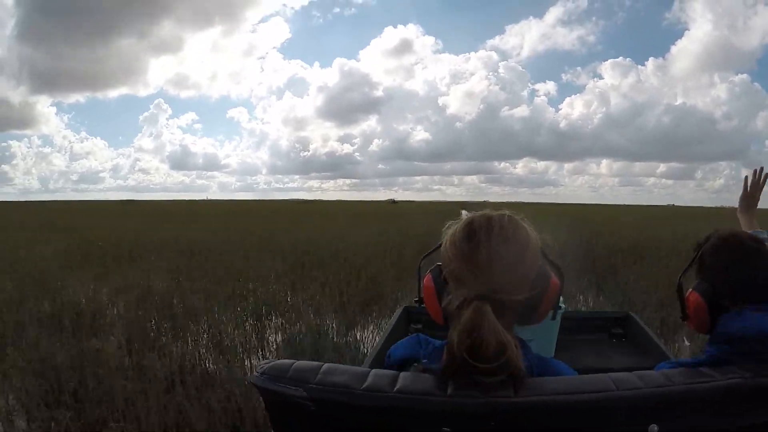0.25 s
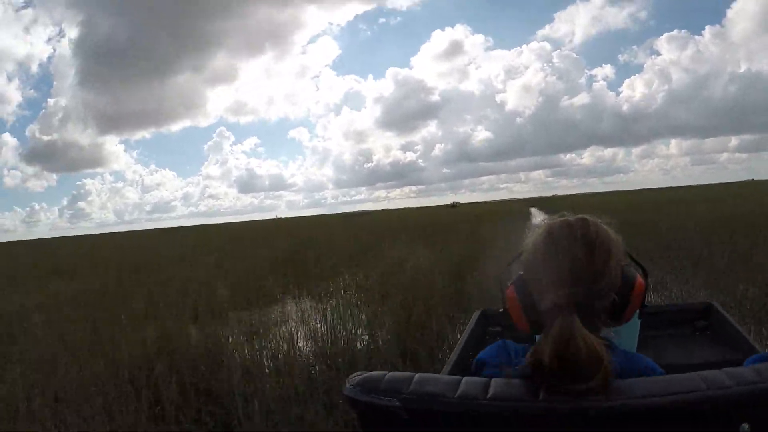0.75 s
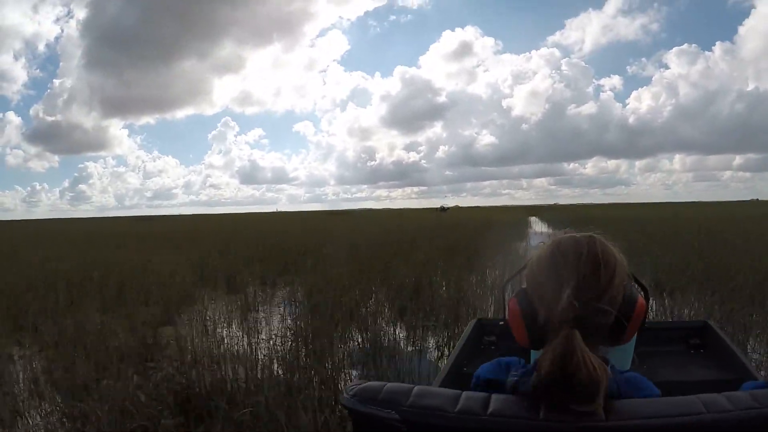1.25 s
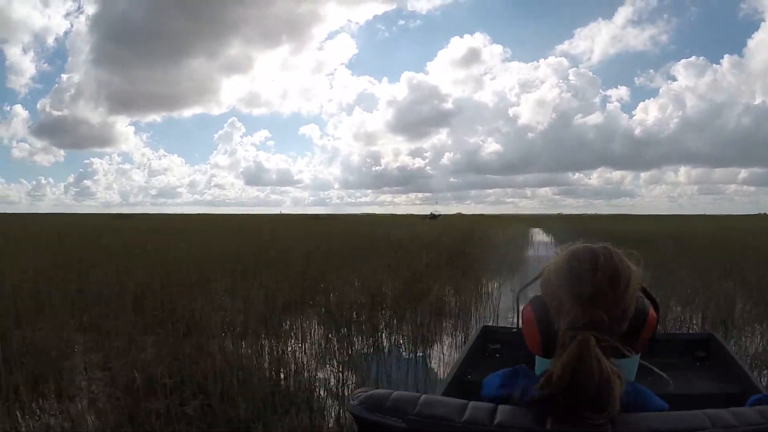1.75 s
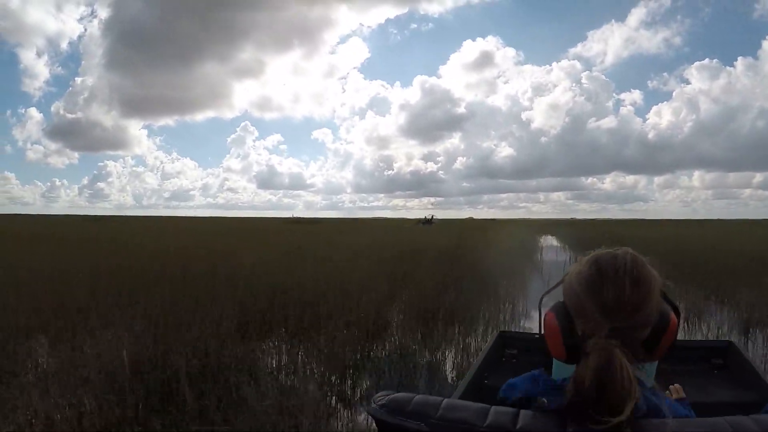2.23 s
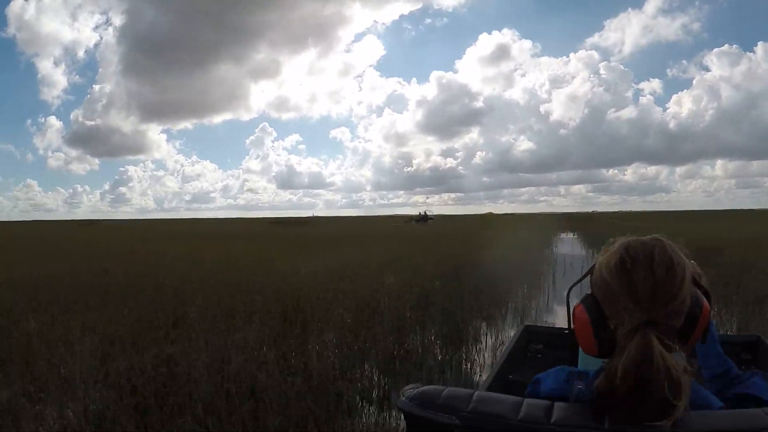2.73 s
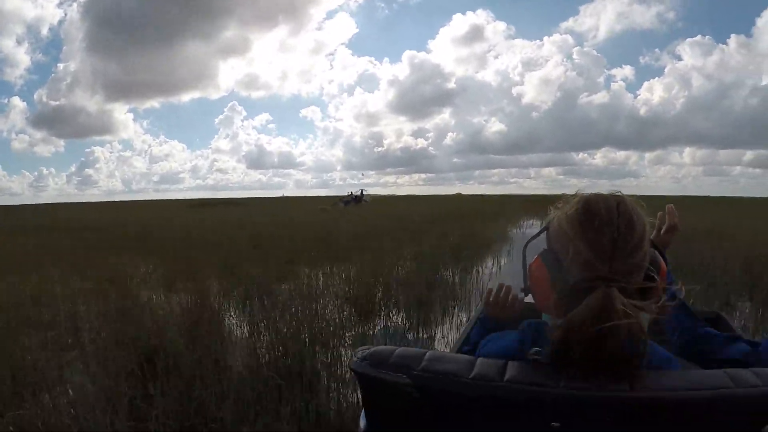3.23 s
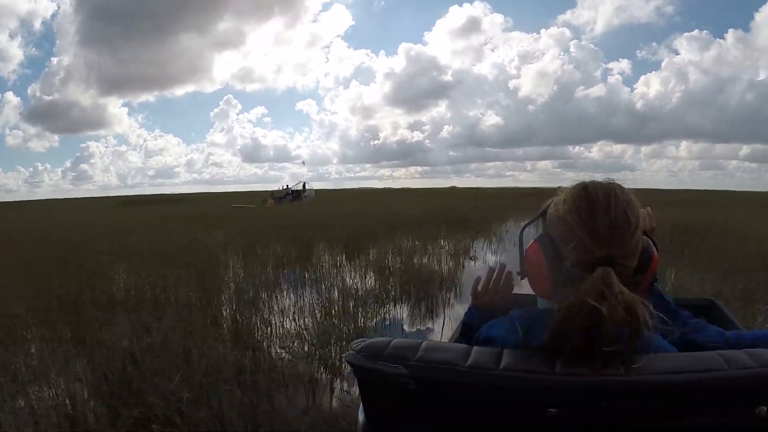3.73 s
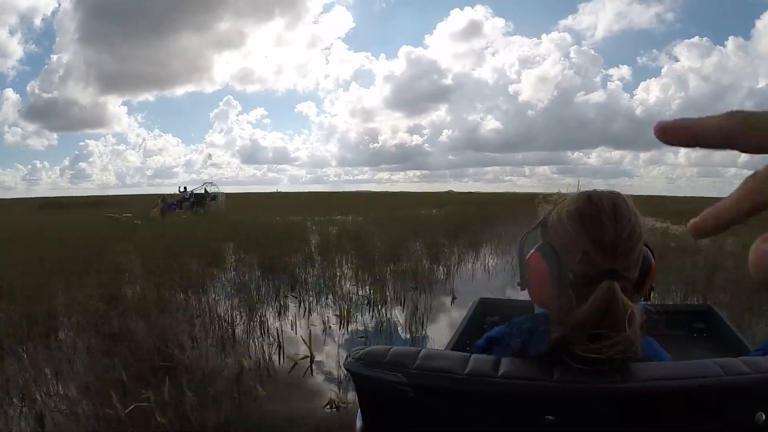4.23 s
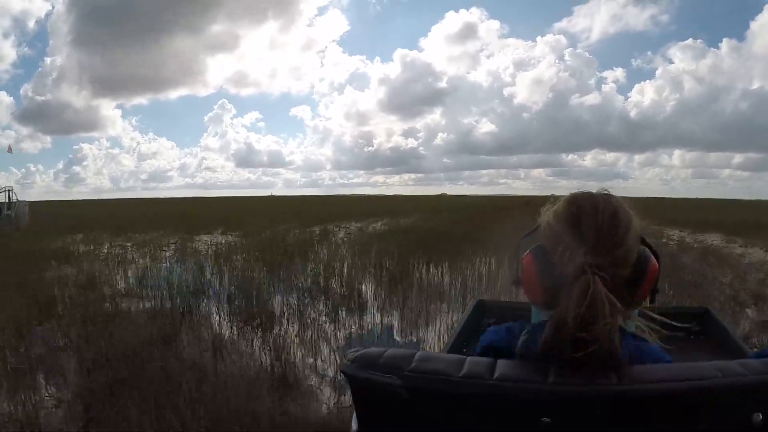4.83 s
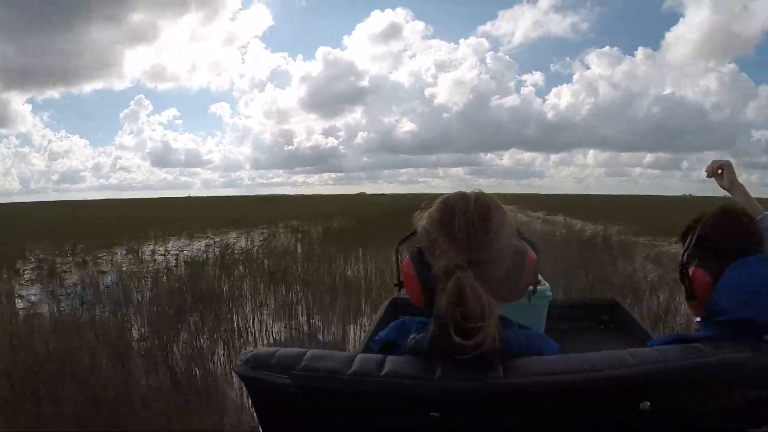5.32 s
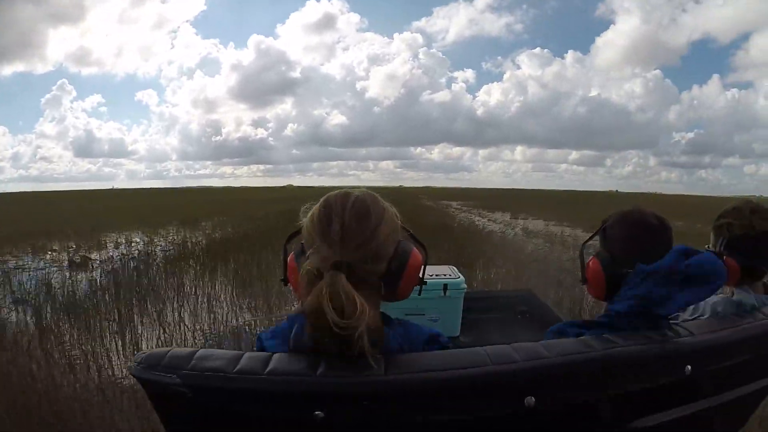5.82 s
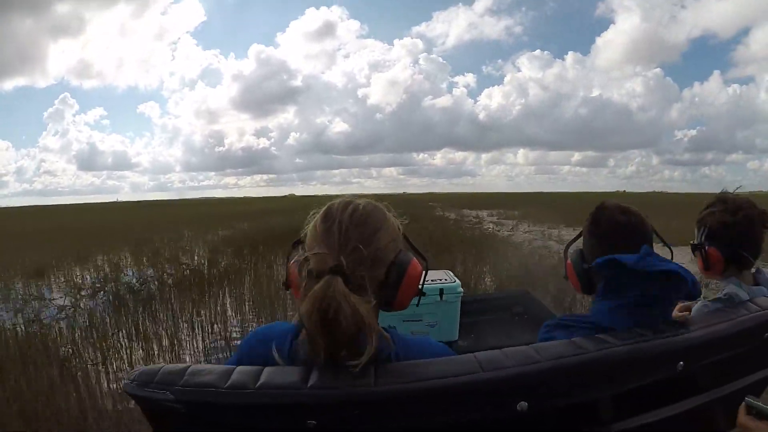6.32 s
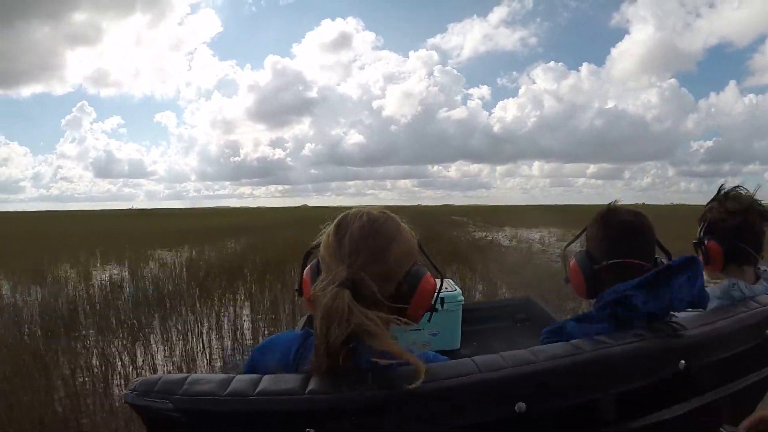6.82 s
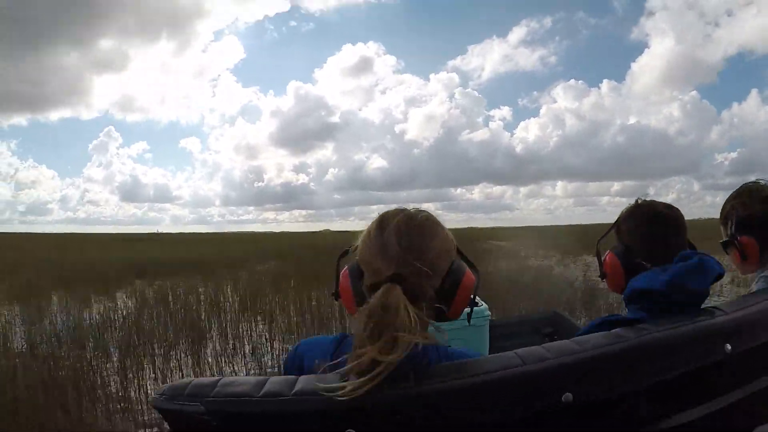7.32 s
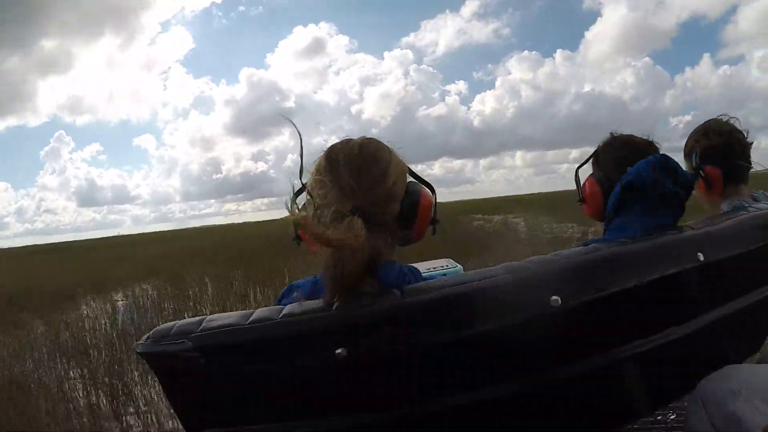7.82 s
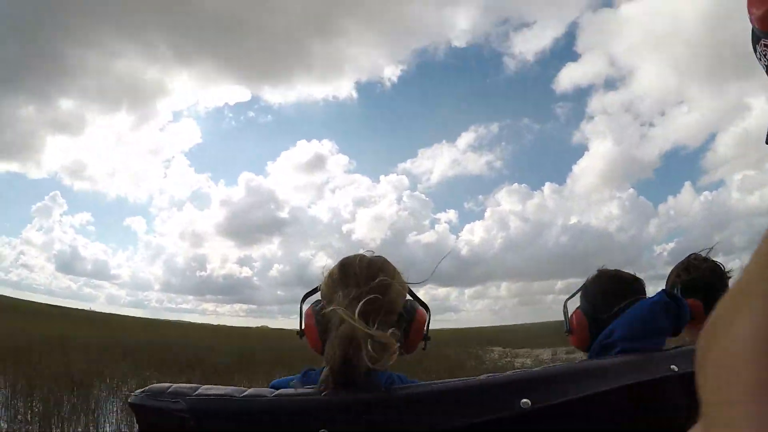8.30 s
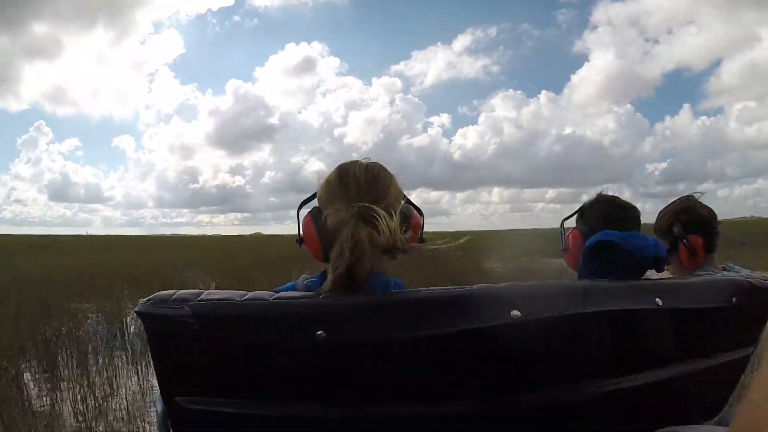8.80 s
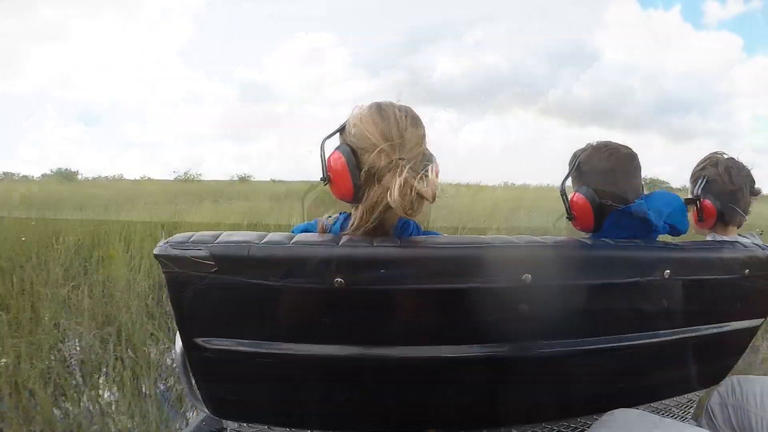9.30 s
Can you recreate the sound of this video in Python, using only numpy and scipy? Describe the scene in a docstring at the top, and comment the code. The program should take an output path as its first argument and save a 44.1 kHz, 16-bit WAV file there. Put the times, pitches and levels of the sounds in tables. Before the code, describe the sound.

An airboat's deep, steady engine and propeller drone fills a windy open deck, with wind puffs and spray ticks, then breaks into whistling gusts.

```python
"""An airboat's three-blade propeller, geared down from an eight-cylinder engine, drones over its own roar.
A small camera hears it in the wind on board, turning twice; locked sine tones make the drone.
Shaped noise makes the roar, hiss and wind; spray ticks ring and puffs of wind strike the microphone.
Near the end the drone fades, the sound drops out for a moment, and whistling gusts take over."""
import sys
import numpy as np
from scipy import signal
from scipy.io import wavfile
from scipy.ndimage import uniform_filter1d, minimum_filter1d

SR = 44100
rng = np.random.default_rng(int(sys.argv[2]) if len(sys.argv) > 2 else 0)


def put_to_file(sound):
    """Save the sound as 16-bit audio at rate SR, in the file named by the first command-line argument."""
    columns = np.atleast_2d(sound).T  # one column per channel
    safe = np.clip(columns, -1, 1)
    whole_steps = np.round(safe * 32767)
    wavfile.write(sys.argv[1], SR, whole_steps.astype(np.int16))


N = 421149
TIME_S = np.arange(N) / SR

# Slow levels of propeller wash and hiss: start_s, wash_db, hiss_db, hiss_top_dulling_db
WASH_AND_HISS = [(0.0, -49, -66, -2.5), (2.52, -48.5, -65, -1.5), (3.0, -52.5, -67, -4),
                 (5.45, -50, -65.5, -2.5), (5.9, -47.5, -70, 1), (6.05, -48.5, -66, 1),
                 (6.18, -48.5, -65.5, 1), (6.28, -60, -68, -1), (6.43, -50, -64.5, 2),
                 (6.67, -46, -66.5, -1.5), (7.04, -49, -65.5, 2), (7.12, -47.5, -69.5, -1),
                 (7.38, -52, -68.5, -2), (7.5, -47, -66.5, 0), (7.65, -51.5, -67, -1),
                 (8.85, -41, -63.5, 0.5), (9.18, -46, -69, -2), (9.55, -40, -84, -6)]
# Brief silence: from_s, to_s
DROP_OUT_S = (9.2020, 9.2179)


def amp(db):
    """Amplitude factor of a level in dB."""
    return 10 ** (np.asarray(db) / 20)


def evened(x):
    """Scales to rms 1."""
    return x / np.sqrt(np.mean(x ** 2) + 1e-20)


def columns(rows):
    """Draws each column after the first (s) as a line through time."""
    s, *values = np.transpose(rows)
    return [np.interp(TIME_S, s, v) for v in values]


def wander(seconds):
    """Random drift of rms 1: white noise averaged twice over the given time."""
    n = max(int(seconds * SR), 1)
    white = rng.standard_normal(N)
    return evened(uniform_filter1d(uniform_filter1d(white, n), n))


def noise(shape, lo_hz, hi_hz, patchy_db, size):
    """Random short-time spectra with drifting patches; rms 1 between lo_hz and hi_hz."""
    hop = size // 4
    bin_hz = np.fft.rfftfreq(size, 1 / SR)
    real, imag, patches = rng.standard_normal((N // hop + 9, len(bin_hz), 3)).T
    patches = uniform_filter1d(patches, size=5, axis=0)  # across frequency
    patches = evened(uniform_filter1d(patches, size=8, axis=1))  # across time
    shape_hz, shape_db = np.transpose(shape)
    bin_db = np.interp(np.log(bin_hz + 1), np.log(shape_hz), shape_db, right=-120)
    spectra = (real + 1j * imag) * amp(bin_db[:, None] + patchy_db * patches)
    in_band = (bin_hz >= lo_hz) & (bin_hz < hi_hz)
    share = np.sum(abs(spectra[in_band]) ** 2) / np.sum(abs(spectra) ** 2)
    sound = signal.istft(spectra, nperseg=size, noverlap=size - hop)[1]
    return evened(sound[size:N + size]) / np.sqrt(share)


def facing(levels_db):
    """Blends three levels as the camera turns twice."""
    # Camera turns: from_s, to_s
    camera_turns = [(4.9, 5.6), (7.8, 8)]
    return np.interp(TIME_S, np.ravel(camera_turns), np.repeat(levels_db, [1, 2, 1]))


def drone():
    """Blade and exhaust tones, locked by the gear; moving air shakes their arrival time and level."""
    # Blade-pass rate: time_s, rate_hz
    speed = [(0.0, 85.35), (0.2, 86.6), (0.45, 87.72), (1.2, 88.8), (1.8, 88.95), (2.1, 89.25),
             (2.8, 88.95), (4.8, 89.17), (5.0, 88.78), (5.3, 87.85), (5.6, 87.51), (6.2, 87.14),
             (6.6, 86.48), (7.0, 87.15), (8.1, 87.05), (8.6, 86.41), (9.55, 86.42)]
    # Blade tones: blade_multiple, ahead_db, after_first_turn_db, after_second_turn_db
    blade_tones = [(1, -29.5, -31.5, -31), (2, -37, -37, -33), (4, -47, -46.5, -50.5), (6, -53, -56, -52.5),
                   (7, -61.5, -65.5, -53), (8, -61, -63, -49), (9, -67, -70.5, -54),
                   (10, -64.5, -63, -59.5), (11, -57.5, -60.5, -64), (12, -65, -68, -61.5),
                   (13, -65, -67, -65), (14, -71, -73, -63), (15, -65.5, -72.5, -72),
                   (16, -73.5, -69.5, -70)]
    # The two blade tones that change most: time_s, third_db, fifth_db
    moving_tones = [(0, -40, -44), (.35, -29, -41.5), (.9, -26.5, -52), (1.8, -32, -60.5),
                    (2.5, -28.5, -61.5), (3.6, -32.5, -53), (4.8, -31, -49), (5.6, -34, -41.5),
                    (6.8, -32, -40.5), (7.7, -34, -41), (8.2, -30, -37), (8.5, -26, -41.5),
                    (9.0, -36.5, -38), (9.55, -35, -43)]
    # Exhaust tones: firing_cycle_multiple, ahead_db, after_first_turn_db, after_second_turn_db
    exhaust = [(3.005, -39.5, -41.5, -41), (5.004, -41, -37, -39.5), (6.974, -46, -55, -45),
               (7.99, -41, -47, -45), (9.01, -47, -58.5, -57.5), (10.98, -55.5, -49, -61.5),
               (13, -55, -59, -57.5), (14.92, -51, -51, -44), (15.92, -63.5, -61.5, -55.5),
               (18.33, -63.5, -62, -57), (23.97, -70.5, -64, -59.5), (25.15, -65, -68, -56)]
    cycles_per_blade = .382  # firing cycles per blade pass, set by the gear
    fade_s, fade_db_per_s = 8.98, -22
    drift_db, drift_s = .35, .25

    blade_passes = np.cumsum(columns(speed)[0]) / SR + .004 * wander(.025)
    tones = [(k, facing(db)) for k, *db in blade_tones]
    tones += zip((3, 5), columns(moving_tones))
    tones += [(k * cycles_per_blade, facing(db)) for k, *db in exhaust]

    total = np.zeros(N)
    for k, level_db in tones:
        # higher tones waver, drift and slip more
        waver_db = .33 * k * wander(.05) + drift_db * np.sqrt(k) * wander(drift_s)
        slip_cycles = .001 * k ** 2 / np.sqrt(1 + k ** 2 / 100) * wander(.06)
        cycles = k * blade_passes + rng.random() + slip_cycles
        total += amp(level_db + waver_db) * np.sqrt(2) * np.sin(2 * np.pi * cycles)
    fade_db = fade_db_per_s * np.maximum(TIME_S - fade_s, 0)
    return amp(fade_db) * total


def air():
    """Rumble and wash waver on their own; eddies roughen the roar and make flutter come in quick bursts."""
    # Noise spectra: freq_hz, relative_db_per_hz
    rumble_shape = [(12, -28), (25, 0.5), (60, 7), (120, 3.5), (250, -7), (400, -13), (800, -37)]
    wash_shape = [(80, -4.5), (200, 9), (310, 10.5), (400, 4.5), (530, 3.5), (570, 0), (750, -3.5),
                  (900, -8), (1300, -26.5), (2000, -48)]
    roar_shape = [(200, -13), (500, -2.5), (800, 5.5), (1200, 6), (1600, -5.5), (2500, -22.5), (4000, -43)]
    flutter_shape = [(300, -5.5), (1000, 1.5), (1700, 6.5), (2800, -4.5), (3700, -5.5), (5000, -10.5),
                     (6300, -21), (7200, -43), (10000, -52)]
    # Rumble level: time_s, level_db
    rumble_level = [(0, -35), (1.3, -36.5), (2, -33.5), (3.7, -36.5), (4.4, -37), (6.7, -31.5), (7.4, -34),
                    (8.8, -33.5), (9.2, -39), (9.35, -33.5), (9.55, -27)]
    # Wind on the microphone: time_s, flutter_db, roar_above_flutter_db
    gusts = [(0.0, -58, 6), (2.15, -57, 4.5), (3.06, -60, 6.5), (5.26, -58.5, 9), (5.29, -58, 9.5),
             (6.14, -56, 3.5), (6.28, -60, 6), (6.54, -55, 5.5), (6.94, -54.5, 4), (7.42, -62, 6),
             (7.47, -56.5, 6), (8.35, -59.5, 3.5), (8.96, -60, 11.5), (9.18, -64.5, 9), (9.26, -59.5, 9),
             (9.28, -75, 14), (9.36, -55, 15), (9.39, -56, 15), (9.47, -47.5, 6), (9.52, -56.5, 22),
             (9.55, -60, 17)]
    # Brief level changes of all this noise, mostly dips: middle_s, gain_db, half_length_s
    level_bumps = [(5.726, -4, 0.016), (7.13, -4, 0.021), (9.244, 0, 0.015), (9.29, 1, 0.011),
                   (9.419, -11, 0.021), (9.509, -12, 0.013)]
    gusty_db, gusty_s = 1, .041

    flutter_db, above_db = columns(gusts)
    flutter_db = flutter_db + gusty_db * wander(gusty_s)
    roar_db = flutter_db + above_db
    eddies = wander(.0019)

    rumble_db = columns(rumble_level)[0] + 2.4 * wander(.0098) + .33 * wander(.12)
    rumble = amp(rumble_db) * noise(rumble_shape, 20, 70, .93, size=2048)
    wash_db = columns(WASH_AND_HISS)[0] + 1.9 * wander(.0046)
    wash = amp(wash_db) * noise(wash_shape, 520, 850, 2.1, size=1024)
    roar = amp(roar_db + 1.1 * eddies) * noise(roar_shape, 900, 1500, 1.0, size=512)
    burst_db = .73 * eddies + 1.0 * wander(.0015)
    flutter = amp(flutter_db + burst_db) * noise(flutter_shape, 1600, 3900, 1.0, size=256)

    bump_db = sum(db * np.exp(-((TIME_S - s) / half_s) ** 2) for s, db, half_s in level_bumps)
    return amp(bump_db) * (rumble + wash + roar + flutter)


def hiss():
    """Spray and blade-tip hiss: nearly even noise whose top band is dulled separately."""
    # Noise spectra: freq_hz, relative_db_per_hz
    body_shape = [(1500, -11), (3000, -13), (4000, -1), (5700, 5), (6400, -3), (7200, -17.5), (8000, -39)]
    top_shape = [(6000, -17.5), (7200, 1), (9000, -4), (10500, -16), (12000, -46)]
    _, hiss_db, dulling_db = columns(WASH_AND_HISS)
    body = noise(body_shape, 4500, 6500, 1.0, size=512)
    top = amp(-21.0 - dulling_db) * noise(top_shape, 7200, 9000, .8, size=512)
    uneven_db = .31 * wander(.019) + .86 * wander(.12)
    return amp(hiss_db + uneven_db) * (body + top)


def puffs():
    """Wind strikes the microphone: each puff swells quickly, crackles for its length and dies away."""
    # Strongest puffs: start_s, bright_db, dull_db, length_s
    strong = [(0.105, -63, -47, .012), (0.158, -54, -54, 0.0071), (0.179, -55, -54, .01),
              (0.483, -55, -43.5, .012), (0.535, -57, -43, 0.016), (0.635, -55, -44, 0.032),
              (0.74, -56, -48, 0.018), (0.892, -56, -48, .014), (1.137, -50, -48, 0.0091),
              (1.246, -52, -45, 0.01), (1.275, -61, -35.5, 0.009), (1.35, -59, -43, 0.051),
              (1.5, -58, -44.5, 0.063), (1.77, -57, -45, 0.035), (1.958, -52, -58, .01),
              (2.09, -60, -40.5, 0.027), (2.18, -52, -53, 0.009), (2.272, -51, -38.5, 0.014),
              (2.514, -54, -48, 0.0084), (2.807, -58, -44, 0.022), (2.861, -57, -41, 0.018),
              (3.333, -54.5, -44, .01), (4.04, -62, -49, .01), (4.129, -60, -50, .02),
              (4.55, -55, -62, 0.0092), (4.928, -65, -48, 0.0081), (5.165, -59, -42, 0.022),
              (5.289, -52, -40, 0.016), (5.313, -53, -35, 0.011), (5.34, -55, -49, .007),
              (5.405, -53.5, -38, 0.016), (5.44, -57, -41, .035), (5.511, -48, -43, 0.0092),
              (5.557, -53, -33, 0.0064), (5.593, -53, -52, 0.013), (5.63, -56, -48, 0.018),
              (5.755, -63, -55, .02), (6.038, -48, -47, 0.0091), (6.481, -52, -54, .01),
              (6.529, -55, -47, 0.013), (6.584, -47.5, -45, 0.019), (6.645, -53, -52, .006),
              (6.8, -54, -52, .008), (6.83, -51, -55, .012), (6.903, -53, -52, 0.018),
              (6.995, -52.5, -52, .018), (7.04, -54, -46, 0.019), (7.194, -55, -50, .01),
              (7.45, -57, -50, 0.019), (7.495, -54.5, -47, 0.045), (7.548, -57, -46, 0.009),
              (8.292, -66, -48, .01), (8.322, -64, -51, .01), (8.427, -73, -37, 0.016),
              (8.695, -63, -37, 0.0091), (8.745, -66, -50, 0.0091), (8.772, -65, -39, .012),
              (8.872, -66, -40, 0.011), (9.255, -59, -41.5, 0.01), (9.272, -68, -59, 0.023),
              (9.297, -64, -52, .012), (9.311, -62, -43.5, 0.0055), (9.32, -56, -42, 0.0033),
              (9.33, -72, -54, 0.017), (9.347, -55, -42, 0.0062), (9.36, -51, -43, 0.012),
              (9.378, -57, -58, 0.014), (9.392, -63, -42, 0.011), (9.407, -64, -40, 0.0075),
              (9.431, -54, -39, 0.022), (9.452, -57, -36.5, 0.017), (9.474, -60, -35.5, 0.008),
              (9.485, -62, -38, 0.0078), (9.51, -62, -45, 0.0054), (9.526, -69, -41.5, 0.034)]
    # Noise spectra, bright part, dull part, dull part after the drop-out: freq_hz, relative_db_per_hz
    bright_shape = [(800, -6.5), (1700, 7.5), (2800, -3.5), (4500, -5), (6200, -12.5), (7200, -36),
                    (10000, -56.5)]
    dull_shape = [(200, -7), (500, 9), (1000, 6.5), (1600, -9), (2500, -12.5), (4000, -26.5)]
    late_dull_shape = [(200, -4), (400, 2), (900, 2), (1400, 2), (1900, -1.5), (2800, -8), (4000, -15),
                       (4800, -34)]
    weak_count, weak_bright_db, weak_dull_db, weak_spread_db, weak_s = 12, -63, -57, 4, .018
    swell_s, late_swell_s = .0018, .0007  # before and after the drop-out
    crackle_db, late_crackle_db = 1.2, 2.5

    weak = []
    for when, size in rng.random((weak_count, 2)):
        db = weak_spread_db * (2 * size - 1)
        weak.append((when * N / SR, weak_bright_db + db, weak_dull_db + db, weak_s))

    t = np.arange(5000) / SR
    envelopes = np.zeros((2, N + 5000))
    for s, bright_db, dull_db, length_s in list(strong) + weak:
        rise_s = late_swell_s if s > DROP_OUT_S[0] else swell_s
        swell = 1 - np.exp(-(t / rise_s) ** 2)
        decay = np.exp(-(t / max(length_s, .003)) ** 3)
        envelopes[:, round(s * SR):][:, :5000] += amp([[bright_db], [dull_db]]) * swell * decay

    late = TIME_S > DROP_OUT_S[0]
    bright = noise(bright_shape, 2000, 6000, .81, size=256)
    early_dull = noise(dull_shape, 600, 1800, 1.3, size=256)
    late_dull = noise(late_dull_shape, 600, 1800, 2.2, size=256)
    parts = np.array([bright, np.where(late, late_dull, early_dull)])
    crackle = amp(np.where(late, late_crackle_db, crackle_db) * wander(.0012))
    return (envelopes[:, :N] * parts).sum(0) * crackle


def spray_ticks():
    """Spray ticks on the housing: each is a sine ring that rises and decays within a few cycles."""
    # Ticks: start_s, peak_db, ring_hz
    ticks = [(2.2383, -53, 3560), (5.382, -54, 3870), (5.62, -66, 8500), (6.0422, -50, 4500),
             (6.4198, -49, 3900), (6.9002, -46, 4440), (6.993, -48, 3900), (7.0509, -43, 4100),
             (9.351, -60, 7000), (9.3935, -58, 9500)]
    peak_cycles = 1.2  # the envelope peaks after this many cycles
    t = np.arange(600) / SR
    out = np.zeros(N + 600)
    for s, db, hz in ticks:
        rise = hz * t / peak_cycles
        envelope = rise * np.exp(1 - rise)
        out[round(s * SR):][:600] += amp(db) * envelope * np.sin(2 * np.pi * hz * t)
    return out[:N]


def whistle():
    """Late gusts whistle in successive glides: a carrier with narrow-band noise for breath."""
    # Glides: time_s, pitch_hz, level_db
    glides = [(9.219, 1250, -75), (9.225, 1230, -49), (9.25, 1130, -45), (9.268, 1150, -49),
              (9.272, 1600, -70), (9.278, 1640, -56), (9.303, 1580, -54), (9.307, 720, -70),
              (9.312, 700, -41), (9.33, 560, -38), (9.345, 450, -39), (9.355, 450, -75), (9.42, 1400, -75),
              (9.433, 1420, -41), (9.445, 1520, -41), (9.46, 1750, -49), (9.478, 2020, -45),
              (9.49, 2100, -47), (9.5, 2100, -75)]
    width_hz = 90
    hz, db = columns(glides)
    lowpass = signal.butter(3, width_hz / 2, fs=SR, output="sos")
    a, b = signal.sosfilt(lowpass, rng.standard_normal((N, 2)), axis=0).T
    phase = 2 * np.pi * np.cumsum(hz) / SR
    steady = 1.1 * a.std()
    return amp(db) * evened((a + steady) * np.cos(phase) + b * np.sin(phase))


def scene():
    """Sums all layers into one channel."""
    return (drone() + air() + hiss() + puffs() + spray_ticks() + whistle())[None]


def record(dry):
    """A quick limiter holds the peaks, the sound drops out briefly, then the top is cut off."""
    knee_db, edge_hz = -18, 16000
    peak_db = 20 * np.log10(-minimum_filter1d(-abs(dry), size=400) + 1e-9)
    cut_db = .8 * np.maximum(peak_db - knee_db, 0)  # ratio 5
    held = dry / amp(uniform_filter1d(cut_db, size=400))
    sounding = (TIME_S < DROP_OUT_S[0]) | (TIME_S > DROP_OUT_S[1])
    held = held * uniform_filter1d(1. * sounding, size=3)
    held = np.pad(held, ((0, 0), (127, 127)), "edge")
    lowpass = signal.firwin(255, edge_hz, window=("kaiser", 9), fs=SR)
    return signal.oaconvolve(held, lowpass[None], "valid")


dry = scene()
out = record(dry)
put_to_file(out)
```